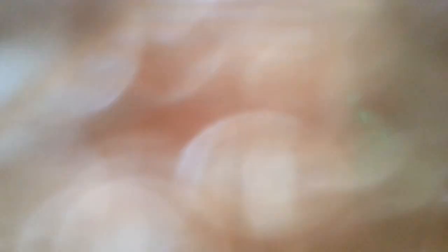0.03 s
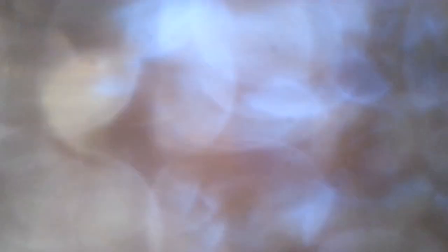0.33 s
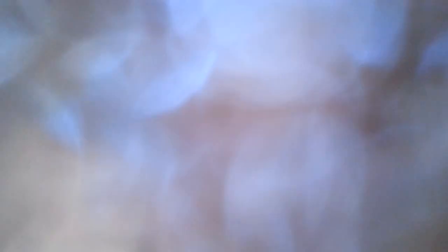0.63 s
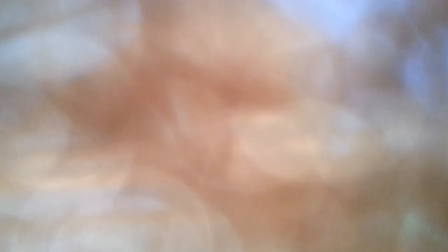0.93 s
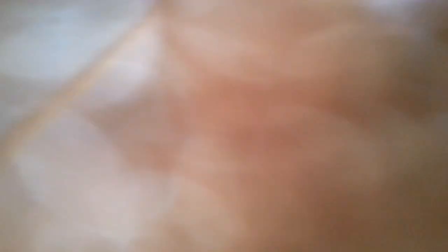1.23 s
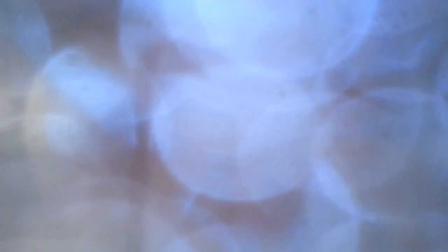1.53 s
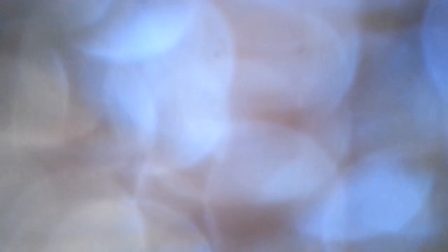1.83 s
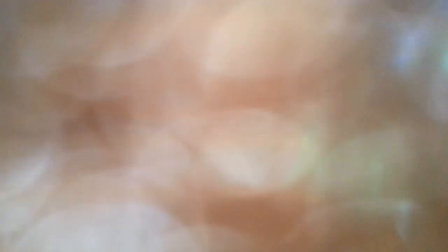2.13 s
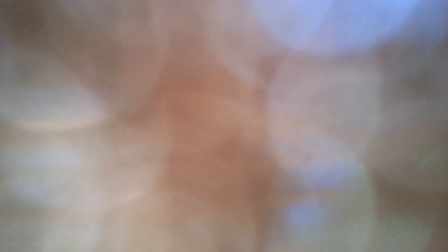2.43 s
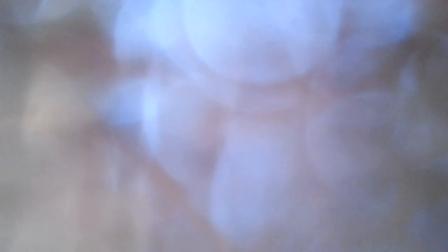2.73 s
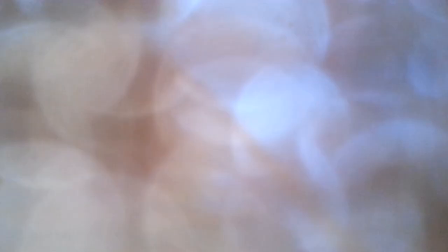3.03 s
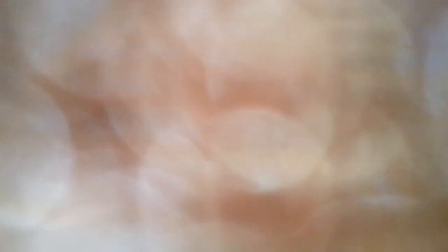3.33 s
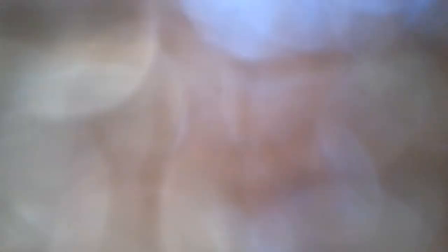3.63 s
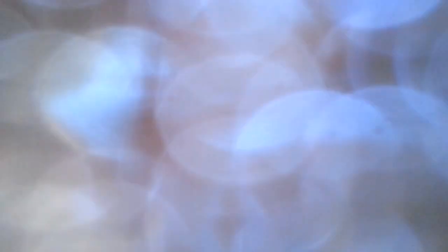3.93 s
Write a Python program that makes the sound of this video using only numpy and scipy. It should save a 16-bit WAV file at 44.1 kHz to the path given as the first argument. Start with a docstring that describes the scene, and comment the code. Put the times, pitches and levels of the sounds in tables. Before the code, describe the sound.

Fabric rubs against a phone carried in a pocket. Each stride brings a soft rub, a bright swipe and a duller drag, with small bumps right on the microphone. A faint street rumble lies underneath.

```python
"""A low rustle of cloth, different in each ear, slides over the two microphone ports of a pocketed phone.
As the wearer walks, friction gives every stride a soft rub, a bright swipe that overloads the right
port, then a duller drag as the cloth pulls tight. Folds bump the ports, threads snap past the edge of
the case, and the weave sticks and slips in short rasps. The street rumbles faintly outside."""
import sys
import numpy as np
from scipy import signal
from scipy.fft import rfft, irfft
from scipy.io import wavfile

SR = 44100
rng = np.random.default_rng(int(sys.argv[2]) if len(sys.argv) > 2 else 0)


def to_wav(sig):
    """Store sig (one row per channel, or 1-D mono) as 16-bit WAV at the path in sys.argv[1].

    Samples outside -1..1 are clipped; the rate is SR.
    """
    pcm = np.clip(np.atleast_2d(sig), -1, 1) * 32767
    pcm = np.round(pcm).astype(np.int16)
    wavfile.write(sys.argv[1], SR, pcm.T)  # frames by channels


N = 176400
TIME = np.arange(N) / SR
LEFT, RIGHT = 0, 1

# a fold bumps a port: centre_s, pitch_hz, envelope_peak_db, port
FOLD_BUMPS = [(.033, 198, -12.5, RIGHT), (.278, 145, -9.5, RIGHT), (0.456, 314, -7.5, LEFT),
              (.535, 520, -0.5, RIGHT), (.695, 332, -6, LEFT), (0.704, 350, -2, RIGHT),
              (0.724, 285, -10, RIGHT), (0.745, 264, -7, RIGHT), (0.769, 251, -7.5, RIGHT),
              (0.794, 237, -8, RIGHT), (0.933, 203, -6.5, RIGHT), (0.974, 120, -19, RIGHT),
              (1.004, 193, -13, LEFT), (1.134, 348, -15, RIGHT), (1.376, 218, -9, RIGHT),
              (1.487, 177, -4.5, RIGHT), (1.555, 265, -4.5, LEFT), (1.621, 410, -9.5, RIGHT),
              (1.723, 308, -5, LEFT), (1.805, 400, 4, RIGHT), (1.832, 440, 6, RIGHT),
              (1.842, 336, 6, RIGHT), (1.861, 288, -7, LEFT), (2.042, 246, -7.5, RIGHT),
              (2.496, 270, -7.5, RIGHT), (2.519, 178, -10.5, RIGHT), (2.681, 262, -5, LEFT),
              (2.711, 242, -11, LEFT), (2.779, 315, -4.5, RIGHT), (2.887, 337, -4, LEFT),
              (2.956, 290, -3, RIGHT), (2.973, 226, 2, RIGHT), (3.003, 260, -12, LEFT),
              (3.049, 320, -12, RIGHT), (3.175, 156, -11.5, RIGHT), (3.196, 194, -12, RIGHT),
              (3.288, 179, -12.5, RIGHT), (3.335, 304, -13, LEFT), (3.448, 248, -11, RIGHT),
              (3.666, 203, -11.5, RIGHT), (3.711, 402, -6, RIGHT), (3.833, 280, -7.5, LEFT),
              (3.918, 270, -4.5, RIGHT)]
# cloth shifts lightly on the case: centre_s, half_length_s, left_db, right_db, bass_gain_db
LIGHT_RUBS = [(0.053, 0.007, -22.5, -27, 8), (0.073, 0.021, -29, -24, 1), (0.161, 0.029, -41, -20.5, -18),
              (0.254, 0.019, -19, -18, -2.5), (0.293, 0.012, -27, -14, 2), (0.348, 0.026, -35, -14.5, -9.5),
              (0.468, 0.016, -21, -26, 3), (0.611, 0.023, -15, -40, -2.5), (0.783, 0.086, -21.5, -21, 1),
              (0.882, 0.0051, -23, -13.5, -2), (0.948, 0.033, -24, -29, 3.5), (0.999, 0.0084, -22, -34, 1),
              (1.295, 0.024, -42, -21.5, -17), (1.392, 0.028, -22.5, -14.5, 2),
              (1.481, 0.025, -44, -14, -2), (1.546, 0.0049, -21, -18, -8),
              (1.596, 0.063, -28.5, -26.5, 1.5), (1.727, 0.13, -23, -27, 1), (1.892, 0.075, -23, -25.5, 0),
              (2.006, 0.029, -37, -20, -3.5), (2.186, 0.0087, -21, -28, -2), (2.275, 0.04, -47, -36, 12),
              (2.4, 0.027, -46, -20.5, -30), (2.494, 0.014, -18.5, -14, -0.5), (2.527, 0.026, -29, -18, 5),
              (2.593, 0.019, -43, -13, -8.5), (2.739, 0.067, -24, -28, 1.5),
              (2.842, 0.079, -19.5, -39, -5.5), (3, 0.081, -22, -21.5, -1.5),
              (3.141, 0.033, -30, -17, -2.5), (3.525, 0.026, -45, -19.5, -7), (3.619, 0.0064, -25, -18, 4),
              (3.649, 0.032, -24, -16, 1.5), (3.735, 0.019, -41, -12.5, -7.5), (3.836, 0.068, -23, -26, -1),
              (4, 0.052, -17.5, -43, 0.5)]
# taut cloth whips across the right port: centre_s, half_length_s, level_db
FAST_SWIPES = [(0.565, 0.012, -4.5), (0.631, 0.025, -15.5), (1.659, 0.0035, -15), (1.684, 0.01, -1.5),
               (1.711, 0.013, -13.5), (1.744, 0.0095, -12.5), (1.761, 0.0086, -14.5), (1.980, 0.004, -14),
               (2.803, 0.01, -3), (2.839, 0.0048, -8.5), (2.896, 0.035, -18), (3.946, 0.013, -5),
               (3.988, 0.0038, -8.5)]
# a thread catches and snaps free: start_s, level_db, port
THREAD_SNAPS = [(0.578, -3, RIGHT), (0.611, -10, RIGHT), (0.7, -7, RIGHT), (1.679, -2, LEFT),
                (1.7205, -8, RIGHT), (1.833, -9, RIGHT), (1.979, -13, RIGHT), (2.954, -16, RIGHT),
                (3.431, -13, RIGHT)]
# the weave sticks and slips: centre_s, half_length_s, pitch_hz, level_db, port
WEAVE_RASPS = [(0.6048, 0.00097, 2040, -6, RIGHT), (0.6066, 0.00069, 2080, -13, RIGHT),
               (0.623, 0.0011, 1310, -5.5, RIGHT), (0.687, 0.0036, 654, -13, RIGHT),
               (1.7225, 0.002, 2800, -6.5, RIGHT), (1.779, 0.0083, 880, -12, RIGHT),
               (2.102, 0.003, 980, -19.5, LEFT), (2.847, 0.0007, 1580, -0.5, RIGHT),
               (2.915, 0.0043, 765, -11, RIGHT), (3.717, 0.0022, 790, -9.5, RIGHT)]
# the pocket pulls tight over both ports: centre_s, half_length_s, left_db, right_db
TIGHT_DRAGS = [(.694, 0.024, -11, -11), (1.776, 0.013, -33, -11.5), (1.8, 0.013, -10, -8.5),
               (1.833, 0.0099, -33, -15), (2.915, 0.011, -15.5, -17), (2.942, 0.023, -9, -10.5)]
# after each drag the cloth holds still on the left port: centre_s, scratch_gain_db
HOLDS = [(0.737, -8), (1.834, -7), (2.967, -12)]

# spectra of the four kinds of friction and of the street: frequency_hz, relative_density_db
REST_SPECTRUM = [(30, -48), (65, -25.5), (110, -7), (180, 2), (400, 5), (650, 1.5), (1600, -5.5),
                 (4200, -11), (6300, -19), (10000, -23), (14000, -34)]
RUB_SPECTRUM = [(30, -24), (65, -49), (115, -4.5), (280, -1), (600, -0.5), (1600, -11), (4200, -16),
                (6300, -23.5), (10000, -27), (14000, -33.5)]
SWIPE_SPECTRUM = [(30, -38), (110, -11.5), (260, -7), (550, 1.5), (1600, -1), (4000, -4), (6300, -13),
                  (10000, -19), (14000, -27.5)]
DRAG_SPECTRUM = [(30, -14), (70, -27), (160, -4.5), (400, 5), (700, 0.5), (1600, -8), (4200, -13),
                 (6300, -25), (10000, -26.5), (14000, -35)]
STREET_SPECTRUM = [(20, -13), (55, -20), (110, 12), (400, -5.5), (2000, -3.5), (10000, -45)]
# response of the right port relative to the left: frequency_hz, gain_db
RIGHT_PORT_RESPONSE = [(50, 5), (110, 0.5), (450, 1), (1500, 1), (4000, -0.5), (6500, 0), (12000, -0.5)]

BODY_EDGE_HZ = 730  # the weave flaps below this, its fibres scratch above
SHEEN_HZ = 7000  # where the top treble begins


def from_db(db):
    """Amplitude grows tenfold for every 20 decibels."""
    return 10 ** (np.asarray(db) / 20)


def unit_rms(x):
    """Dividing by the root mean square gives a signal unit power."""
    return x / np.sqrt(np.mean(x ** 2) + 1e-20)


def drift(rate_hz):
    """Low-passed noise wanders smoothly with unit spread, at a pace set by rate_hz."""
    step, settle = 40, 2000  # samples per control point; points dropped while the filter settles
    pole = np.exp(-2 * np.pi * rate_hz * step / SR)
    noise = rng.standard_normal(N // step + settle + 2)
    slow = signal.lfilter([1], [1, -2 * pole, pole * pole], noise)[settle:]
    return np.interp(np.arange(N) / step, np.arange(len(slow)), unit_rms(slow))


def coloured(x, spectrum):
    """Folding the cepstrum gives the causal, minimum-phase filter that has this spectrum."""
    hz, db = np.transpose(spectrum)
    grid_hz = np.maximum(np.arange(N // 2 + 1) * SR / N, 1)
    gain = from_db(np.interp(np.log(grid_hz), np.log(hz), db))
    cepstrum = irfft(np.log(gain), N)
    cepstrum[1:N // 2] *= 2
    cepstrum[N // 2 + 1:] = 0
    return irfft(rfft(x) * np.exp(rfft(cepstrum)), N)


def split_bands(x, edge_hz):
    """A zero-phase low-pass and its remainder form complementary low and high bands."""
    low = signal.sosfiltfilt(signal.butter(2, edge_hz, fs=SR, output="sos"), x)
    return low, x - low


def swells(rows, fall_ratio=1):
    """Each slide speeds up and slows down in a pointed bell; incoherent slides add in power."""
    power = 0
    for centre_s, half_s, db in rows:
        distance = np.abs(TIME - centre_s) / np.where(TIME < centre_s, half_s, half_s * fall_ratio)
        power = power + from_db(db) ** 2 * np.exp(-np.minimum(distance, 10) ** 1.8)
    return np.sqrt(power)


def friction(spectrum, port, flap_db, scratch_db, judder_hz, tick_db, bass_gain=1):
    """Friction noise is a sum of random fibre slips; its bass and treble fluctuate independently."""
    slips_per_s, slip_spread_db = 5000, 6
    ticks_per_s, tick_spread_db = 40, 6.5  # coarser threads
    signs = rng.choice([-1, 1], N)
    slip_sizes = from_db(slip_spread_db * np.clip(rng.standard_normal(N), -2, 2))
    slips = unit_rms(signs * slip_sizes * (rng.random(N) < slips_per_s / SR))
    hiss = 0.57 * rng.standard_normal(N)
    tick_sizes = from_db(tick_spread_db * rng.uniform(-2, 1.9, N))
    ticks = unit_rms(signs * tick_sizes * (rng.random(N) < ticks_per_s / SR))
    sound = coloured(slips + hiss + from_db(tick_db) * ticks, spectrum)
    if port == RIGHT:
        sound = coloured(sound, RIGHT_PORT_RESPONSE)
    flap, scratch = split_bands(sound, BODY_EDGE_HZ)
    flap = flap * from_db(flap_db * drift(judder_hz))
    scratch = scratch * from_db(scratch_db * drift(judder_hz))
    return (bass_gain * flap + scratch) / np.std(flap + scratch)


def resting_rustle(port):
    """Cloth never lies quite still, so friction sustains a nearly steady noise."""
    level = from_db((-27, -26.5)[port] + 0.18 * drift(8.8))
    return level * friction(REST_SPECTRUM, port, flap_db=2.5, scratch_db=1.5, judder_hz=39, tick_db=-9)


def street_rumble(level_db=-42.5):
    """Steady noise from outside is heard as a rumble because its spectrum peaks in the bass."""
    return from_db(level_db) * unit_rms(coloured(rng.standard_normal(N), STREET_SPECTRUM))


def fold_bumps(port, rise_cycles=0.5, fall_cycles=0.81):
    """A fold displaces the air at the port: a pressure pulse of a cycle or two, with a little grit."""
    grit_band = signal.butter(2, (172, 1010), "band", fs=SR, output="sos")
    grit = 0.28 * unit_rms(signal.sosfilt(grit_band, rng.standard_normal(N)))
    out = np.zeros(N)
    for centre_s, pitch_hz, db, where in FOLD_BUMPS:
        if where == port:
            near = np.abs(TIME - centre_s) < 0.03
            cycles = (TIME[near] - centre_s) * pitch_hz
            envelope = np.exp(-np.abs(cycles / np.where(cycles < 0, rise_cycles, fall_cycles)) ** 1.66)
            out[near] += from_db(db) * envelope * (np.sin(2 * np.pi * cycles) + grit[near])
    return out


def light_rubs(port):
    """Sliding friction swells as the leg swings; slack cloth carries more bass than taut cloth."""
    level = swells((s, half_s, port_db[port]) for s, half_s, *port_db, _ in LIGHT_RUBS)
    bass = swells((s, half_s, port_db[port] + bass_db) for s, half_s, *port_db, bass_db in LIGHT_RUBS)
    return level * friction(RUB_SPECTRUM, port, flap_db=4, scratch_db=1.96, judder_hz=96,
                            tick_db=-12.5, bass_gain=bass / level)


def fast_swipes(fall_ratio=0.7, sheen_lag=0.26):
    """Friction brightens with speed: cloth accelerates over the right port, then sticks."""
    sound = friction(SWIPE_SPECTRUM, RIGHT, flap_db=-0.5, scratch_db=2, judder_hz=610, tick_db=-12)
    dull, sheen = split_bands(sound, SHEEN_HZ)
    delayed = [(s + sheen_lag * half_s, half_s, db) for s, half_s, db in FAST_SWIPES]
    return swells(FAST_SWIPES, fall_ratio) * dull + swells(delayed, fall_ratio) * sheen


def thread_snaps(port, decay_s=0.00097):
    """The sudden release of a caught thread gives a broadband crack that decays exponentially."""
    envelope = np.zeros(N)
    for start_s, db, where in THREAD_SNAPS:
        if where == port:
            decay = np.exp(-np.clip((TIME - start_s) / decay_s, 0, 20))
            envelope += from_db(db) * (TIME >= start_s) * decay
    return envelope * unit_rms(coloured(rng.standard_normal(N), SWIPE_SPECTRUM))


def weave_rasps(port):
    """Stick-slip motion excites one broad resonance of the stretched cloth."""
    out, slips = np.zeros(N), rng.standard_normal(N)
    for centre_s, half_s, pitch_hz, db, where in WEAVE_RASPS:
        if where == port:
            resonance = signal.iirpeak(pitch_hz, Q=4.6, fs=SR)
            out += swells([(centre_s, half_s, db)]) * unit_rms(signal.lfilter(*resonance, slips))
    return out


def tight_drags(port):
    """Slow, heavy friction judders in the low middle, with more top treble on the left."""
    level = swells((s, half_s, port_db[port]) for s, half_s, *port_db in TIGHT_DRAGS)
    sound = friction(DRAG_SPECTRUM, port, flap_db=2, scratch_db=3.4, judder_hz=110, tick_db=-3.5)
    sheen_db = (7, 1.5)[port]
    return level * coloured(sound, [(SHEEN_HZ / 2, 0), (SHEEN_HZ, sheen_db)])


def held_still(sound, half_s=0.026):
    """Scratching needs sliding: it dips while taut cloth holds still, and the flapping goes on."""
    flap, scratch = split_bands(sound, BODY_EDGE_HZ)
    dip_db = sum(db * np.exp(-((TIME - centre_s) / half_s) ** 2) for centre_s, db in HOLDS)
    return flap + scratch * from_db(dip_db)


def scene():
    """Pressures superpose: each port hears the cloth that touches it, and both hear the same street."""
    sources = (resting_rustle, fold_bumps, light_rubs, thread_snaps, weave_rasps, tight_drags)
    cloth = np.array([sum(source(port) for source in sources) for port in (LEFT, RIGHT)])
    cloth[RIGHT] += fast_swipes()
    cloth[LEFT] = held_still(cloth[LEFT])
    return cloth + street_rumble()


def record(dry, low_cut_hz=55, overload=0.95, high_cut_hz=14600):
    """Bandwidth and headroom are finite: deep bass is thinned, loud peaks clip flat, the top is cut."""
    thinned = signal.sosfilt(signal.butter(2, low_cut_hz, "high", fs=SR, output="sos"), dry)
    clipped = np.clip(thinned, -overload, overload)
    return signal.sosfilt(signal.ellip(10, 0.1, 85, high_cut_hz, fs=SR, output="sos"), clipped)


dry = scene()
out = record(dry)
to_wav(out)
```